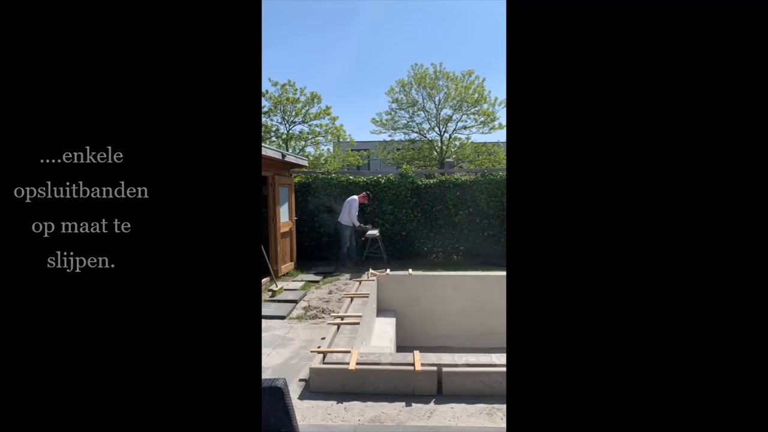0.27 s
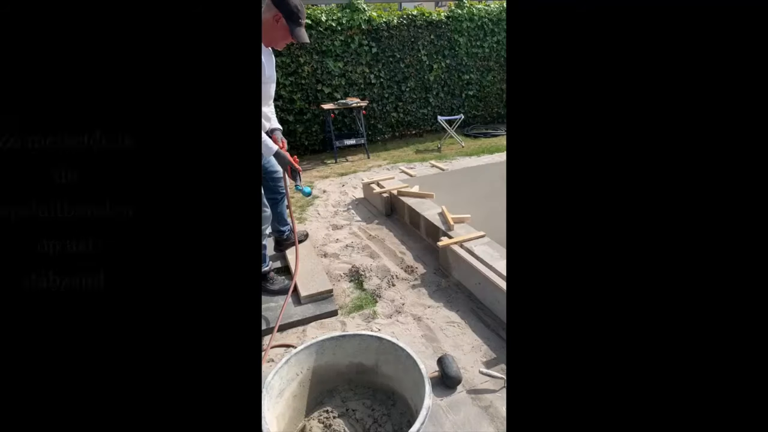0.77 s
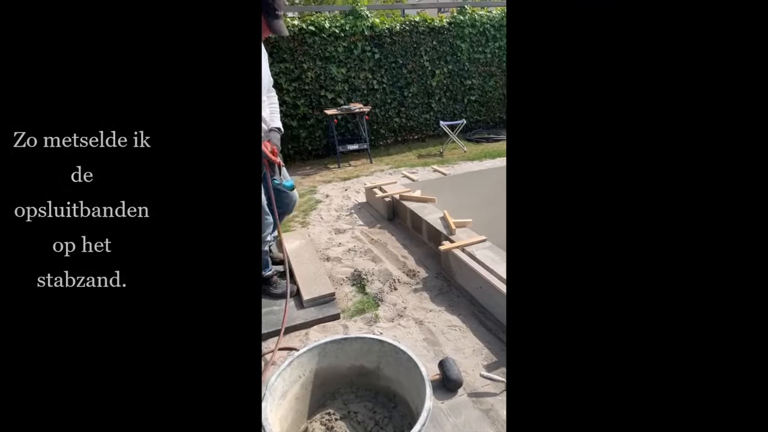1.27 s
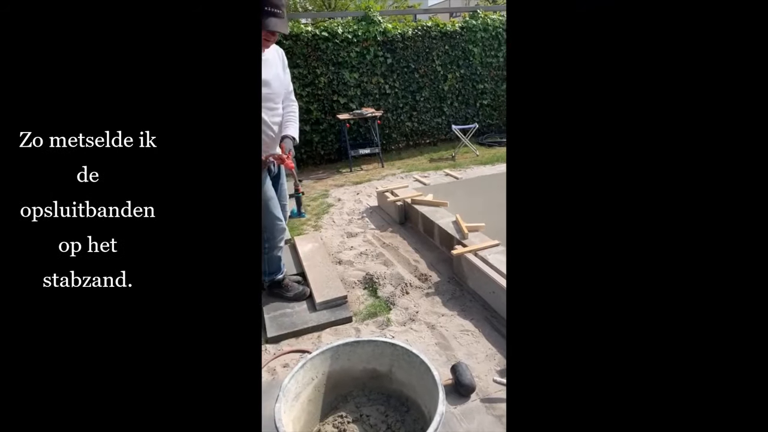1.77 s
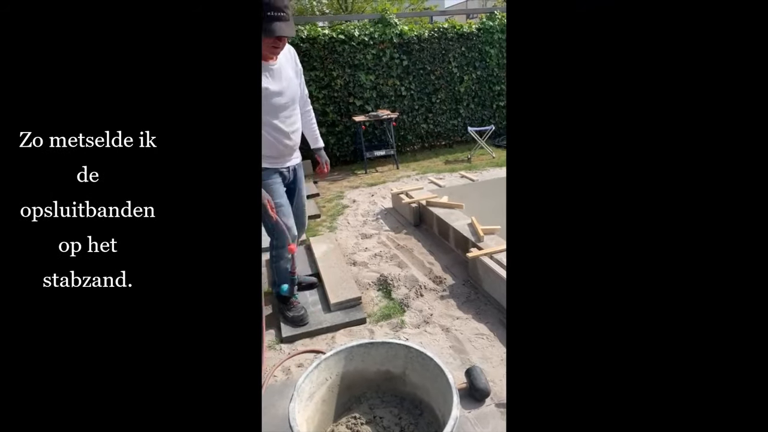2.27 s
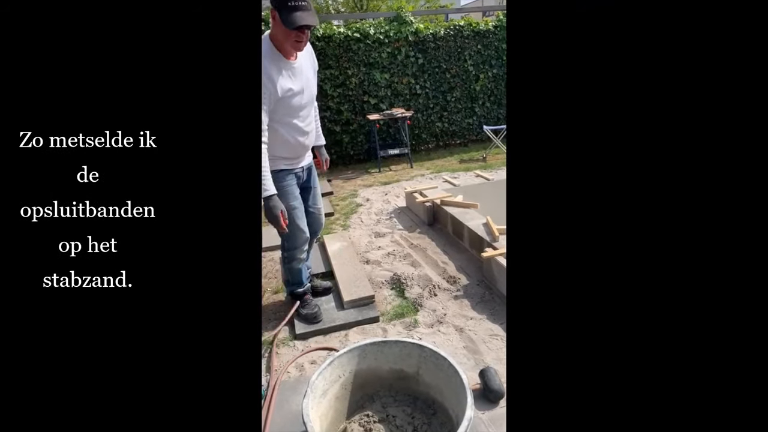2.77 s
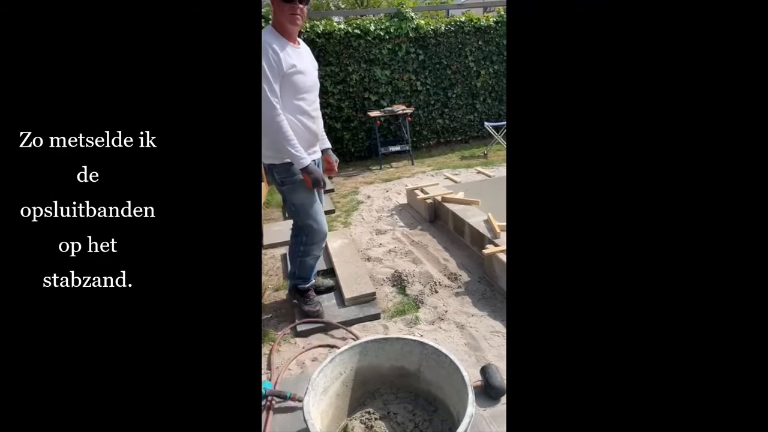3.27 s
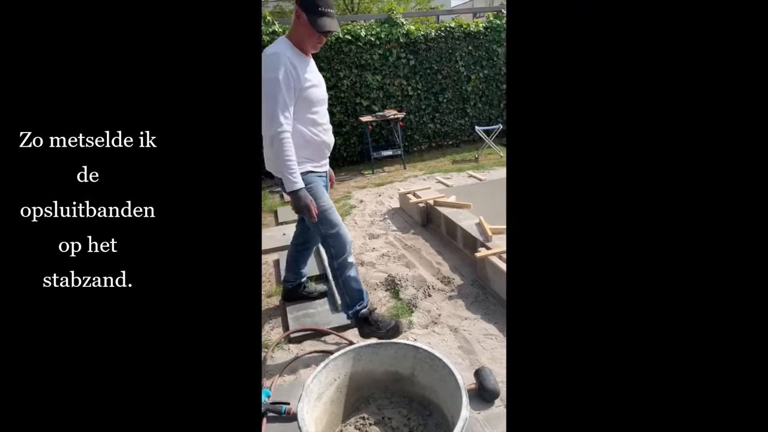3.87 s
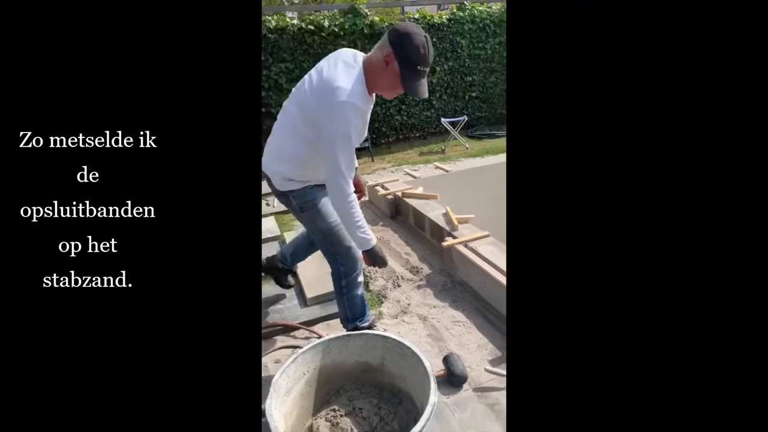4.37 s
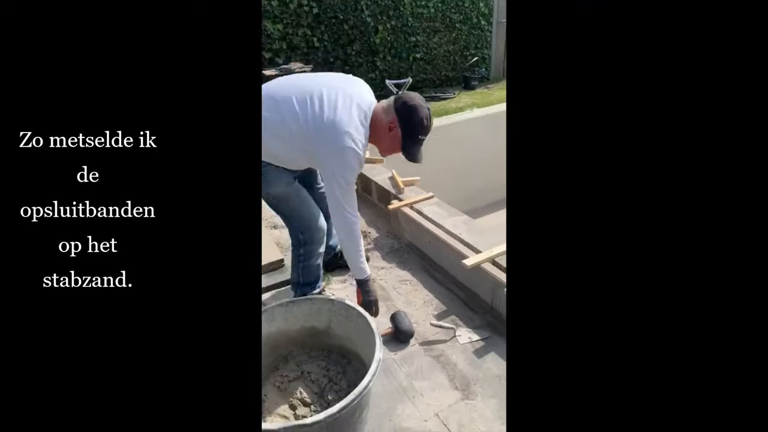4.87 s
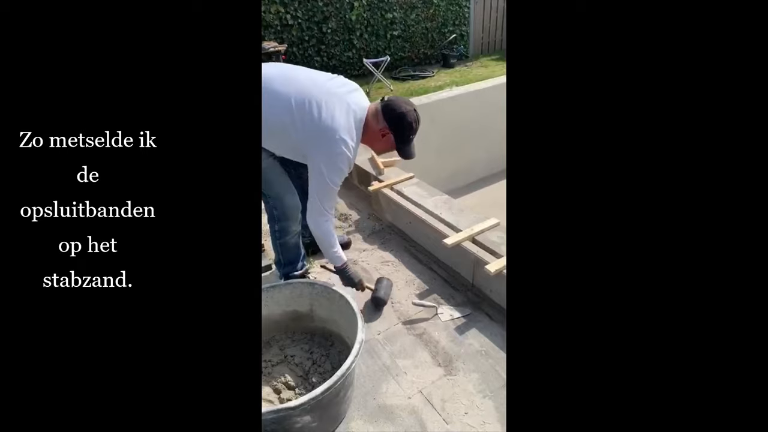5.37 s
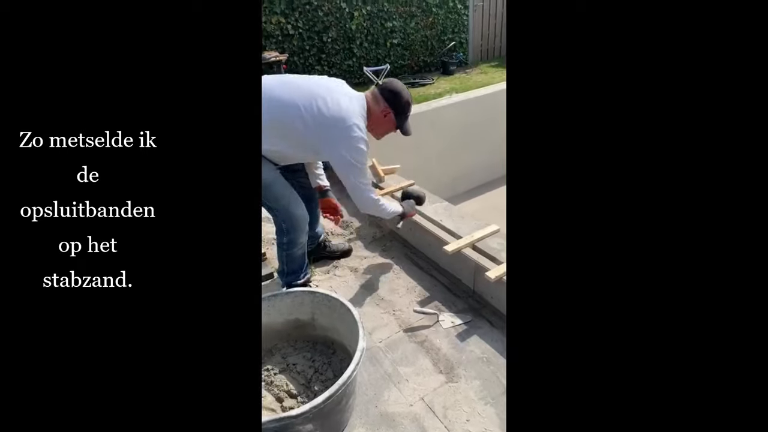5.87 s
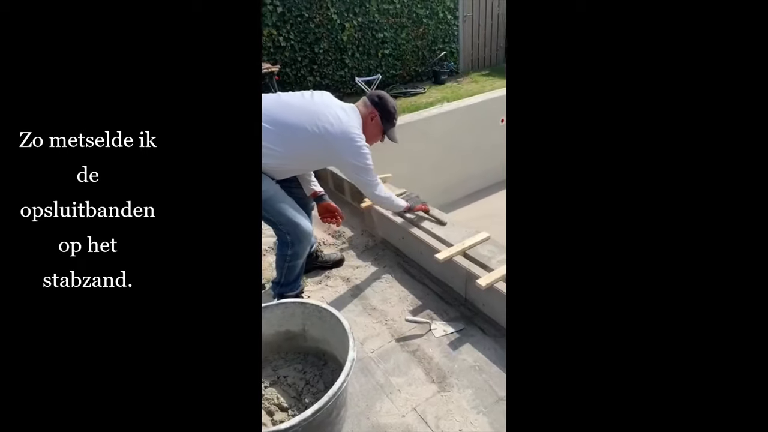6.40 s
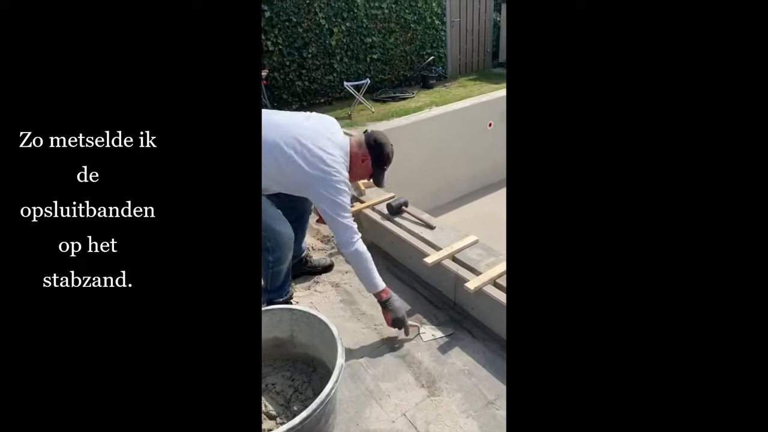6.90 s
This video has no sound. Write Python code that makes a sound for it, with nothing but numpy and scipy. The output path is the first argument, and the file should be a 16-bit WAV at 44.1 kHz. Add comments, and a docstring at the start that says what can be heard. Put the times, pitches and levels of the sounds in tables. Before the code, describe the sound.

A disc cutter grinds loudly through a concrete kerb from the start, its steel disc ringing and squealing over motor whine and a low machine hum. It eases at about 0.6 seconds and cuts off abruptly at 0.8. A much quieter garden follows, with distant traffic rumble and a thin hiss. From about 1.5 seconds boots scuff and crunch on sand, with ticks of grit and dull heel thumps on slabs. A sparrow chirps faintly around 1.5 seconds. A tool clatters on the slabs with a short ring from 2.7 to 2.9 seconds, and again around 3.3. More scuffs come between 4 and 5.8 seconds, with another chirp at 4.6 and a firmer step at 5.2. At 6.4 seconds a mallet is laid down with one dry knock. Faint chirps follow, and a steel trowel scrapes briefly off a slab at about 7 seconds.

```python
"""A disc cutter grinds through a concrete kerb in a garden, its steel disc singing and squealing over motor
whine and a nearby machine's hum. It lifts out, and at 0.8 s the sound cuts off. After a short gap the
quiet garden fades in: traffic rumbles, boots scuff sand, sparrows chirp in the hedge, heels thump.
From 2.7 s a tool clatters on the slabs; near the end a mallet is laid down and a trowel scraped up.
Two microphone ports a few centimetres apart hear it all."""
import sys
import numpy as np
from scipy import signal
from scipy.fft import rfft, irfft, next_fast_len
from scipy.io import wavfile
from scipy.ndimage import uniform_filter1d, map_coordinates

SR = 44100
rng = np.random.default_rng(int(sys.argv[2]) if len(sys.argv) > 2 else 0)


def output_pcm(signal):
    """Save a mono or channel-first signal as 16-bit PCM at the path in sys.argv[1].

    Samples are clipped to [-1, 1] before scaling.
    """
    pcm = np.clip(np.atleast_2d(signal).T, -1, 1) * 32767
    wavfile.write(sys.argv[1], SR, np.round(pcm).astype(np.int16))


N = 314874
T = np.arange(N) / SR


def amp(db):
    return 10 ** (np.asarray(db) / 20)


def unit(x):
    return x / np.sqrt(np.mean(x ** 2) + 1e-20)


def add(out, start, sound):
    """Mixes sound into out at start seconds."""
    part = out[round(start * SR):][:len(sound)]
    part += sound[:len(part)]


def along(points, hz):
    """Reads (Hz, value) points on a log axis."""
    freqs, values = np.transpose(points)
    return np.interp(np.log(hz + 1), np.log(freqs + 1), values)


def curves(rows):
    """One automation curve for each column after the time."""
    times, *columns = np.transpose(rows)
    return [np.interp(T, times, column) for column in columns]


def wobble(rate, size=N):
    """A smooth random curve, rate knots a second."""
    return map_coordinates(rng.standard_normal(int(size * rate / SR) + 4), [T[:size] * rate])


def filtered(x, response):
    """x through a complex frequency response."""
    size = next_fast_len(N + SR // 2)
    return irfft(rfft(x, size) * response(np.fft.rfftfreq(size, 1 / SR)), size)[..., :N]


def coloured(x, spectrum):
    """x through an EQ curve, at rms 1."""
    return unit(filtered(x, lambda hz: amp(along(spectrum, hz))))


def bell(hz, centre, width, db):
    """What one EQ bell adds to a gain of 1."""
    return (amp(db) - 1) / (1 + ((hz - centre) / width) ** 2)


def drift(shape, bands, frames):
    """A random field, smoothed over pitch and time."""
    field = uniform_filter1d(rng.standard_normal(shape), bands, axis=0)
    return unit(uniform_filter1d(field, frames, axis=1))


def patchy(depth_db):
    """White noise with patches of random gain in time and pitch."""
    spectra = signal.stft(rng.standard_normal(N), nperseg=512)[2]
    gain = amp(depth_db * drift(spectra.shape, bands=5, frames=8))
    return signal.istft(spectra * gain, nperseg=512)[1][:N]


def ring(modes, crack_db, crack_t60):
    """One blow: modes swell within a millisecond, at fresh strengths, under a short crack."""
    t = np.arange(SR // 5) / SR
    tones = sum((-1) ** k * amp(db + rng.normal(0, .84) - 60 * t / t60) * np.sin(2 * np.pi * hz * t)
                for k, (hz, db, t60) in enumerate(modes))
    crack = amp(crack_db - 60 * t / crack_t60) * rng.standard_normal(len(t))
    return tones * (1 - np.exp(-t / .00041)) + crack


def gritty(sound, t60):
    """Smears a clean blow into a gritty contact with a noise burst; peak 1."""
    body = signal.fftconvolve(sound, ring([], crack_db=0, crack_t60=t60)[:SR // 30])
    return body / np.abs(body).max()


# Disc against concrete. Each row: frequency in Hz, level in dB.
GRIND_EQ = [(300, -28), (420, -28), (600, -17.5), (938, -9), (1285, -14), (1600, -4), (1800, -2.5),
            (2400, -11), (2800, -6.5), (3000, -8), (3400, -6), (3650, -6.5), (4035, 0), (4783, -4.5),
            (5100, -4), (5586, -0.5), (6481, 1), (6950, -4), (7600, -1), (7950, -7), (8300, -1), (8800, -8),
            (9350, 2.5), (10100, -6), (10800, -3), (11500, -3)]
# The wheel guard's hollow resonances. Each row: centre in Hz, half-width in Hz, boost in dB.
GUARD_BELLS = [(1800, 260, 3), (2650, 160, 4)]

def grind(turns, start_db, change_db):
    """The worn rim repeats its bumps every turn; grit adds hiss that throbs with the spin."""
    rim = rng.standard_normal((12, round(SR / 144)))  # rim shapes, morphed through at 8 a second
    bumps = map_coordinates(rim, [T * 8 % 11, turns % 1 * rim.shape[1]], order=3, mode="wrap")
    throb = amp(.6 * np.cos(2 * np.pi * turns) + 2.7 * np.cos(8 * np.pi * turns + 1) + 1.5 * wobble(60))
    contact = coloured(.65 * unit(bumps) + unit(throb * patchy(depth_db=1.4)), GRIND_EQ)
    low = filtered(contact, lambda hz: 1 / (1 + (hz / 5600) ** 8))
    hollow = filtered(low, lambda hz: 1 + sum(bell(hz, *row) for row in GUARD_BELLS))
    # The body follows only half of the treble's level change.
    return amp(start_db) * (amp(change_db) * (contact - low) + amp(change_db / 2 - 1) * hollow)


# The disc's song lines, modes and a sideband among them, in two matching lists: frequency in Hz, level in dB.
DISC_HZ = [1830, 1885, 3881, 3973, 4100, 5922, 6037, 6270, 6466, 6508, 6611, 6810, 7370, 7450, 7655, 7800,
           8242, 8479, 9410, 9803, 9921, 10401, 10690, 10772, 10901, 11057, 11225, 11510, 5771, 7537, 11644,
           11789]
DISC_DB = [-55, -55, -54, -52, -53, -48, -50, -56, -45, -46, -42, -52, -51, -53, -51, -55, -52, -50, -46,
           -54, -54, -53, -52, -53, -54, -55, -49, -51, -56, -55, -57, -58]

def disc_song(angle):
    """The steel disc sings; its spinning pattern passes once a turn and splits each mode."""
    song = sum(amp(db + 3 + 4.5 * wobble(18, SR)) * np.sin(2 * np.pi * hz * T[:SR] + 1.5 * wobble(28, SR))
               for hz, db in zip(DISC_HZ, DISC_DB))
    return (1 + .4 * np.cos(angle)) * song


# Motor tones, in two matching lists: multiple of disc speed, level in dB.
MOTOR_ORDERS = [6, 8, 12, 14, 16, 49]
MOTOR_DB = [-63, -51, -44, -54, -53, -50]
# Load on the motor. Each row: time in seconds, gain in dB.
MOTOR_LOAD = [(0, -.5), (.24, 0), (.29, -4), (.34, 2), (.43, 6), (.6, 1.5), (.66, -9), (.8, -18)]

def motor_whine(angle):
    """Tones locked to the spin swell as the disc bites."""
    tones = sum(amp(db + 1 + 3.5 * wobble(12, SR)) * np.sin(order * angle + .5 * wobble(18, SR))
                for order, db in zip(MOTOR_ORDERS, MOTOR_DB))
    return amp(curves(MOTOR_LOAD)[0][:SR]) * tones


# The squeal. Each row: time in seconds, pitch in Hz, level in dB, octave's level in dB.
SQUEAL_PATH = [(0, 2600, -58, -46), (.05, 2600, -58, -56), (.27, 2600, -60, -58), (.32, 2604, -45, -49),
               (.42, 2610, -45, -38), (.52, 2616, -42, -41), (.58, 2622, -41, -45), (.63, 2624, -47, -54),
               (.72, 2624, -60, -56), (.8, 2624, -72, -62)]

def squeal():
    """The disc binds in the slot and squeals: a wavering tone and its octave."""
    hz, db, octave_db = curves(SQUEAL_PATH)
    phase = 2 * np.pi * np.cumsum(hz) / SR + .7 * wobble(20)
    return amp(3.5 + 1.5 * wobble(17)) * (amp(db) * np.sin(phase) + amp(octave_db) * np.sin(2 * phase))


# In the slot, then lifting out. Each row: time in seconds, level in dB.
CUT_FADER = [(0, -27.5), (.35, -28), (.41, -25.5), (.618, -26), (.708, -39), (.79, -45)]
# Disc speed. Each row: time in seconds, turns a second.
DISC_SPEED = [(0, 143.9), (.25, 143.8), (.42, 144.1), (.6, 144.6), (.8, 144.8)]
# Narrow dips in the cutter's spectrum. Each row: centre in Hz, half-width in Hz, gain in dB.
CUTTER_NOTCHES = [(1310, 35, -10), (2440, 30, -8), (2990, 25, -8), (3240, 20, -6), (4350, 30, -7),
                  (5340, 50, -9), (6970, 25, -7), (7900, 60, -9), (8870, 50, -9), (9560, 25, -7),
                  (10120, 50, -10)]

def cutter():
    """Grind, song, whine and squeal, mixed through a set of narrow notches."""
    level_db, = curves(CUT_FADER)
    change_db = level_db - level_db[0]
    turns = np.cumsum(curves(DISC_SPEED)[0]) / SR
    angle = 2 * np.pi * turns[:SR]  # song and whine last one second
    out = grind(turns, level_db[0], change_db)
    add(out, 0, amp(change_db[:SR]) * disc_song(angle) + motor_whine(angle))
    out += squeal()
    return filtered(out, lambda hz: np.prod([1 + bell(hz, *row) for row in CUTTER_NOTCHES], axis=0))


# The machine's harmonics. Each row: multiple of the fundamental, level in dB.
HUM_HARMONICS = [(1, -59.5), (2, -47), (3, -63), (4, -59.5), (6, -65.5)]

def hum(pitch_hz=46.75):
    """A steady machine drones close by: low harmonics on a bed of dark noise."""
    tones = sum(amp(db - 1 + 2.5 * wobble(7.6)) * np.sin(2 * np.pi * k * pitch_hz * T + k)
                for k, db in HUM_HARMONICS)
    bed_eq = [(15, -31), (45, 2), (130, 1.5), (250, -14.5), (900, -16.5), (2000, -39.5)]
    return tones + amp(-54.5) * coloured(rng.standard_normal(N), bed_eq)


# The garden's ambience. Each row: frequency in Hz, level in dB.
AIR_EQ = [(28, -23), (51, 2.5), (76, -1.5), (112, -6), (187, -12.5), (354, -20), (671, -15), (1122, -17.5),
          (1673, -27.5), (2366, -40), (3550, -35.5), (5612, -44), (9088, -46.5)]
# The low rumble wavers unevenly in level. Each row: time in seconds, level in dB.
RUMBLE_LEVEL = [(.84, -64), (1.14, -63), (1.3, -69), (1.58, -64), (1.89, -69), (2.3, -65), (2.6, -73),
                (3.19, -66.5), (3.47, -61), (3.59, -74), (4.0, -61.5), (4.15, -66), (5.0, -63), (5.09, -70),
                (5.22, -59), (5.65, -70.5), (6.12, -68.5), (6.25, -63), (6.8, -62.5), (7.07, -72)]

def traffic_and_air():
    """Far traffic drones round one low note, under a thin hiss with a faint narrow whir."""
    air = coloured(patchy(depth_db=1.3), AIR_EQ)
    bass = filtered(air, lambda hz: 1 / (1 + (hz / 140) ** 4))
    drone = filtered(bass, lambda hz: 1 + 1.2 / (1 + ((hz - 53) / 4.2) ** 2))
    hiss = filtered(air - bass, lambda hz: 1 + bell(hz, centre=1150, width=25, db=5))
    return amp(curves(RUMBLE_LEVEL)[0] + 1.5 * wobble(6)) * unit(drone) + amp(-71) * hiss


# Sand's crunch. Each row: frequency in Hz, level in dB.
SAND_EQ = [(300, -3), (600, -16), (938, -3.5), (1285, -7), (1775, -3), (2468, -2.5), (3276, -1),
           (4035, 2.2), (4783, 1.1), (5586, 0), (6481, 0.4), (7576, -4.5), (8780, 1), (9982, -3.5),
           (11184, -11.5)]
# Scuffs. Each row: peak time, rise per 20 dB, hold and fall per 20 dB, all in seconds,
# then level in dB, coarse grit's gain in dB.
SCUFF_CUES = [(.845, .01, .2, .1, -85, 7), (1.15, .06, 0, .06, -76, 10), (1.476, .02, .286, .08, -79, 7),
              (1.844, .02, .09, .1, -72, 8), (2.02, .19, 0, .03, -59.5, 0),
              (2.185, .02, .065, .015, -58, 3), (2.29, .05, .03, .1, -76, 2), (2.434, .05, 0, .05, -80, -2),
              (2.564, .08, 0, .075, -61, -4), (2.77, .07, 0, .065, -59.5, -11),
              (2.808, .006, 0, .095, -45.5, -4), (3.106, .3, 0, .065, -80.5, -8),
              (3.266, .03, .03, .04, -67, -2), (3.385, .06, 0, .062, -57.5, 3),
              (4.07, .012, 0, .105, -68.5, -12), (4.22, .07, .08, .05, -69.5, 8),
              (4.33, .05, 0, .067, -59, 0), (4.7, .15, .05, .1, -88, 12), (4.87, .02, .05, .1, -67, 6),
              (4.96, .13, .07, .075, -56.5, 3), (5.15, .05, .06, .1, -62, -1),
              (5.26, .095, 0, .067, -53, -9), (5.42, .077, 0, .3, -73, 0), (5.53, .017, 0, .11, -67.5, 0),
              (5.63, .3, 0, .1, -73.5, 2), (5.74, .155, 0, .144, -72.5, 6), (6.24, .05, 0, .2, -78, 6),
              (6.39, .02, .02, .05, -79, 0), (6.44, .01, .04, .13, -82, 16),
              (6.96, .045, .02, .02, -65, -6), (6.985, .03, .025, .04, -60, -6),
              (7.14, .066, 0, .05, -80.5, 0)]

def scuffs():
    """Boots and sleeves crunch the sand; between scuffs, cloth and sand shift faintly."""
    fine_gain = coarse_gain = amp(-99 + 5 * wobble(7))
    for peak, rise, hold, fall, db, coarse_db in SCUFF_CUES:
        ramps = np.maximum((peak - T) / rise, 0) + np.maximum((T - peak - hold) / fall, 0)
        envelope = amp(db - 20 * ramps)
        fine_gain = np.maximum(fine_gain, envelope)
        coarse_gain = np.maximum(coarse_gain, amp(coarse_db) * envelope)
    grains = unit(amp(2.5 * wobble(540) + .9 * wobble(60)) * patchy(depth_db=2.2))
    sand = coloured(grains, SAND_EQ)
    coarse = filtered(sand, lambda hz: 1 / (1 + (hz / 3500) ** 8))
    return fine_gain * (sand - coarse) + coarse_gain * coarse


# Grit underfoot. Each row: start in seconds, level in dB.
GRIT_CUES = [(.846, -64), (1.078, -68), (1.8544, -64), (1.8877, -56), (2.0014, -52.5), (2.171, -53.5),
             (2.1902, -52.5), (2.2957, -59.5), (2.5592, -53), (2.9346, -53), (3.0381, -66), (3.0691, -68),
             (3.0999, -63), (3.2669, -49.5), (3.287, -55), (3.2963, -60), (4.0687, -53.5), (4.1066, -58.5),
             (4.2119, -60), (4.3176, -57.5), (4.8705, -60), (5.1412, -56.5), (5.2621, -44), (5.4142, -63),
             (5.533, -57), (6.2236, -56), (6.3851, -65), (7.128, -62)]

def grit_cracks():
    """Single grains crack in bright ticks, with ten faint strays at chance moments."""
    out = np.zeros(N)
    strays = [(when * N / SR, -72 + 6 * force) for when, force in rng.random(size=(10, 2))]
    for start, db in GRIT_CUES + strays:
        add(out, start, amp(db) * ring([], crack_db=-2.5, crack_t60=.017))
    return filtered(out, lambda hz: 1j * hz / (2500 + 1j * hz))


# Chirps. Each row: start and length in seconds, top and end pitch in Hz, level in dB.
CHIRP_CUES = [(1.505, 0.17, 3330, 2900, -72.5), (3.477, .19, 3300, 2750, -86),
              (4.648, 0.155, 3400, 3020, -70), (6.725, .042, 4400, 3900, -82),
              (6.765, .028, 3650, 3300, -77), (6.795, .035, 3400, 3000, -84)]

def sparrows(flutter_hz=300, scoop_hz=400, scoop_s=.008):
    """Each chirp scoops up, then falls in pitch; a fast uneven flutter makes it hoarse."""
    out = np.zeros(N)
    for start, length, top_hz, end_hz, db in CHIRP_CUES:
        size = round(length * SR)
        progress = np.linspace(0, 1, size)
        flutter = 2 * np.pi * flutter_hz * length * progress + 1.8 * wobble(90, size)
        glide = end_hz + (top_hz - end_hz) * (1 - progress) ** 1.4
        scoop = scoop_hz * np.exp(-progress * length / scoop_s)
        phase = 2 * np.pi * np.cumsum(glide - scoop + 85 * wobble(140, size)) / SR
        envelope = np.sin(np.pi * progress ** .7) ** .6 * amp(3 * wobble(110, size))
        rasp = .9 * progress ** .6 * np.sin(phase - flutter)
        add(out, start, amp(db + 2.5) * envelope * (np.sin(phase) + rasp))
    return out


# A slab under a heel. Each row: mode in Hz, level in dB, t60 in seconds.
HEEL_MODES = [(75, -12, .15), (158, -6, .09), (259, -7, .061), (354, -9, .044)]
# Footfalls. Each row: start in seconds, level in dB.
HEEL_CUES = [(1.539, -55.5), (2.03, -77), (2.228, -40.5), (2.739, -44.5), (2.9, -56), (3.328, -48),
             (3.366, -48), (5.22, -49), (6.228, -52)]

def heels():
    """Heels thump the slabs' low modes."""
    out = np.zeros(N)
    for start, db in HEEL_CUES:
        add(out, start, amp(db) * ring(HEEL_MODES, crack_db=-44, crack_t60=.014))
    return out


# The tool, and the stone under it. Each row: mode in Hz, level in dB, t60 in seconds.
TOOL_MODES = [(1120, 0, .12), (1180, -8, .08), (1245, -2, .09), (3850, -10, .07)]
SLAB_MODES = [(620, -8, .02), (800, -1, .035), (930, -4, .03), (1500, -3, .012), (1950, -3, .012),
              (2250, -4, .015)]
# Resonances of the hard contacts. Each row: centre in Hz, width in Hz, gain in dB.
CLATTER_BANDS = [(1500, 1500, -5), (2300, 500, -5), (3880, 300, 1), (4500, 800, -6), (5800, 500, 1),
                 (7100, 1600, 4), (10300, 1200, -2)]
# Knocks. Each row: start in seconds, then ring, thud relative to ring, click and rattle in dB.
KNOCK_CUES = [(2.7128, -43, -14, -48, -50), (2.7275, -41, 6, -36, -44), (2.7394, -44, -2, -29, -39),
              (2.8062, -42, -15, -39, -46), (2.813, -49, -15, -52, -55), (2.821, -49, -12, -50, -52),
              (2.833, -50, -12, -52, -53), (2.8396, -49, -8, -41, -50), (2.858, -49, -15, -54, -56),
              (2.896, -49, -8, -53, -63), (3.266, -62, -10, -62, -66), (3.321, -58, 4, -64, -62),
              (3.3306, -47, 6, -49, -55), (3.335, -53, 4, -48, -60), (3.342, -51, 4, -58, -57),
              (3.352, -55, 3, -60, -62), (3.364, -52, -6, -54, -58), (3.370, -43, 0, -39, -52),
              (3.384, -57, 3, -58, -60)]

def tool_knocks():
    """A tool clicks and rattles on the slabs: it rings on while the stone only thuds."""
    out, clicks = np.zeros((2, N))
    for start, ring_db, thud_db, click_db, rattle_db in KNOCK_CUES:
        thud = gritty(ring(SLAB_MODES, crack_db=-30, crack_t60=.01), t60=.006)
        add(out, start, amp(ring_db) * ring(TOOL_MODES, crack_db=-40, crack_t60=.01) / 2)
        add(out, start, amp(ring_db + thud_db) * thud)
        add(clicks, start, ring([], click_db, crack_t60=.0089) + ring([], rattle_db, crack_t60=.084))
    clatter = lambda hz: .28 + sum(amp(db) * 1j * hz * width / (centre ** 2 - hz ** 2 + 1j * hz * width)
                                   for centre, width, db in CLATTER_BANDS)
    return out + filtered(clicks, clatter)


# The mallet's handle. Each row: mode in Hz, level in dB, t60 in seconds.
HANDLE_MODES = [(260, -35, .05), (580, -19, .015), (1050, -9, .01), (1600, -1, .008), (2100, 2, .008),
                (2500, -5, .006), (3200, -8, .006), (3800, -7, .007), (5200, -13, .005)]
# Its landing. Each row: start in seconds, level in dB.
MALLET_CUES = [(6.4258, -30)]

def mallet():
    """The mallet is laid on the kerb with one dry knock."""
    out = np.zeros(N)
    for start, db in MALLET_CUES:
        add(out, start, amp(db + 1.5) * ring(HANDLE_MODES, crack_db=-23, crack_t60=.005))
    return out


# The steel blade. Each row: mode in Hz, level in dB, t60 in seconds.
TROWEL_MODES = [(1410, -19, .25), (1513, -13, .12), (1990, -11, .07), (2196, -7, .07), (2342, -4, .08),
                (5690, 3, .055), (6600, 2, .04), (6869, -2, .025), (7700, -9, .015), (10090, -4, .015),
                (11100, -4, .015)]
# Catches. Each row: start in seconds, peak in dB, low modes' gain in dB.
TROWEL_CUES = [(6.9591, -54, -4), (6.968, -57, 2), (6.982, -54, -2), (6.9865, -40.5, -16),
               (6.993, -47.5, 3), (7.0001, -50, 3), (7.0085, -52, 0)]

def trowel():
    """The trowel's blade catches on grit as it is scraped up off the slab."""
    out = np.zeros(N)
    for start, db, low_db in TROWEL_CUES:
        modes = [(hz, level + low_db * (hz < 3000), t60) for hz, level, t60 in TROWEL_MODES]
        add(out, start, amp(db) * gritty(ring(modes, crack_db=-7, crack_t60=.02), t60=.005))
    return out


def yard(x, wet_db, t60, dull_hz, thin_hz):
    """Walls and hedge answer after a few milliseconds, duller and thinner than the source."""
    t = np.arange(SR // 2) / SR
    tail = rng.standard_normal(len(t)) * amp(-60 * t / t60)
    echo = signal.fftconvolve(np.pad(x, (300, 0)), tail / np.linalg.norm(tail))[:N]
    tone = lambda hz: 1j * hz / (thin_hz + 1j * hz) / (1 + 1j * hz / dull_hz) ** 2
    return x + amp(wet_db) * filtered(echo, tone)


def scattered(x):
    """The same sound by other paths: every band's phase drifts."""
    spectra = signal.stft(x, nperseg=256)[2]
    phase = np.pi * drift(spectra.shape, bands=3, frames=60)
    return signal.istft(spectra * np.exp(1j * phase), nperseg=256)[1][:N]


# Stereo placement of cutter and garden. Each row: frequency in Hz, left port's lead in radians.
CUTTER_LEAD = [(20, 0), (400, -.2), (860, -1.3), (1160, -1.3), (1300, .3), (1735, 1.8), (1850, .9),
               (2100, .8), (2650, 1.3), (2900, 2.7), (3300, 1.5), (4000, 2.1), (4500, 3.1), (5000, 3.2),
               (5220, 3.8), (6200, 6.2), (7400, 6.6), (8500, 9.2), (9400, 9.6), (10300, 12.4),
               (12000, 12.7)]
GARDEN_LEAD = [(20, 0), (600, -.4), (860, -.9), (1120, .4), (1640, .4), (2150, 1.1), (2670, 2.5),
               (3270, 1.4), (3700, 1.7), (4310, 2.9), (5250, 3.3), (5600, 4.2), (6120, 6.1), (7490, 6.5),
               (8010, 8.4), (8350, 9.3), (9560, 9.6), (10400, 12.5), (12000, 12.6)]
# How alike the ports are at best. Each row: frequency in Hz, likeness from 0 to 1.
PORT_LIKENESS = [(30, 0.92), (125, .91), (350, .8), (800, 0.45), (1700, 0.78), (2600, 0.62), (4500, 0.8),
                 (12000, 0.94)]

def ports(x, leads):
    """The ports differ by a phase lead, and by scattered sound where it nears a quarter cycle."""
    def mid_side(hz):
        likeness = along(PORT_LIKENESS, hz) - .62 * np.sin(along(leads, hz)) ** 2
        spread = np.arccos(np.clip(likeness, 0, 1)) / 2
        return np.array([np.cos(spread), np.sin(spread)])
    mid, side = filtered(np.array([x, scattered(x)]), mid_side)
    lead = lambda hz: np.exp(.5j * along(leads, hz) * np.array([[1], [-1]]))
    return filtered(np.array([mid + side, mid - side]), lead)


def scene(cut_s=.7923, garden_s=.84):
    """A hard cut ends the cutter and hum; after a gap the quiet garden fades in."""
    cut_off = amp(-29 * np.clip(T - cut_s, 0, .1) / .007)
    fade_in = amp(-15 * np.clip(garden_s - T, 0, .1) / .02) * (T > cut_s)
    hedge = yard(sparrows(), wet_db=-4, t60=.2, dull_hz=4000, thin_hz=100)
    tools = yard(tool_knocks() + trowel(), wet_db=-12, t60=.25, dull_hz=3000, thin_hz=100)
    tools += yard(mallet(), wet_db=-2.5, t60=.33, dull_hz=7000, thin_hz=6000)
    garden = traffic_and_air() + scuffs() + grit_cracks() + heels() + tools + hedge
    return cut_off * ports(cutter() + hum(), CUTTER_LEAD) + fade_in * ports(garden, GARDEN_LEAD)


def record(dry):
    """A steep high cut: nothing passes above the band limit."""
    top_hz, slope_hz = 11960, 350
    return filtered(dry, lambda hz: np.sin(np.clip((top_hz - hz) / slope_hz, 0, 1) * np.pi / 2) ** 2)


dry = scene()
out = record(dry)
output_pcm(out)
```